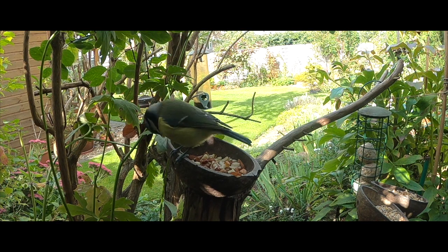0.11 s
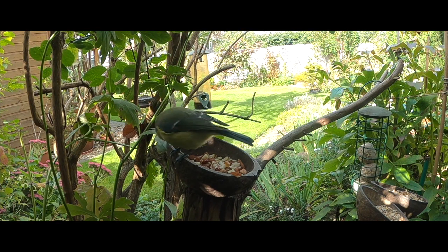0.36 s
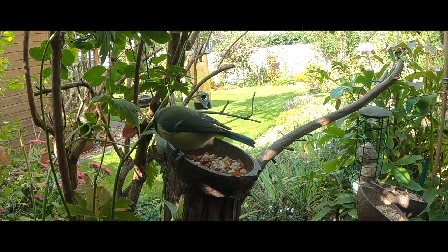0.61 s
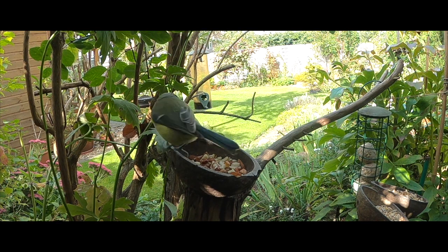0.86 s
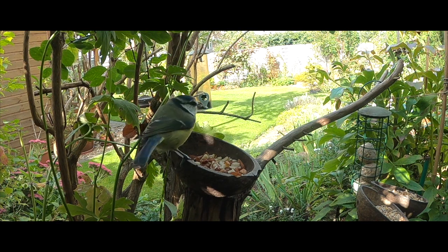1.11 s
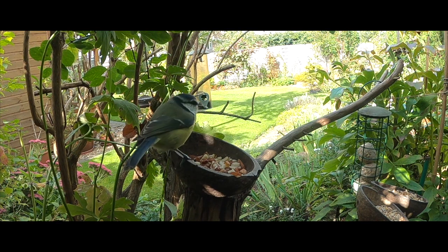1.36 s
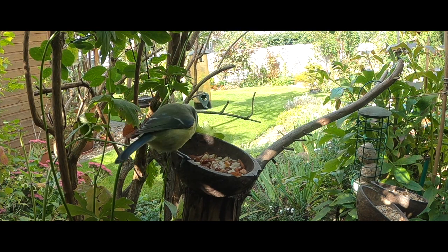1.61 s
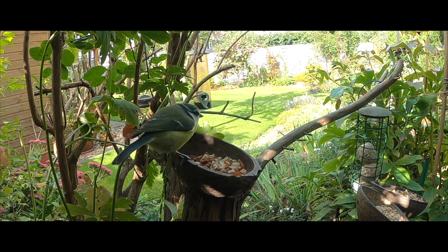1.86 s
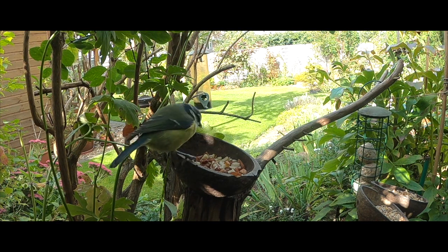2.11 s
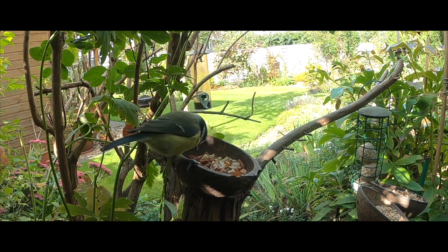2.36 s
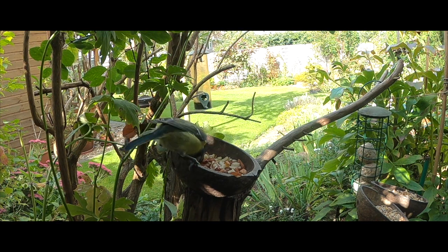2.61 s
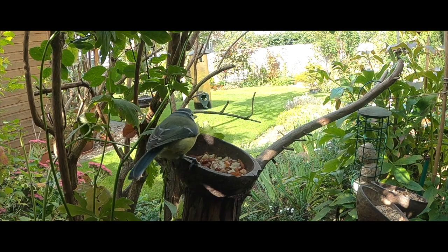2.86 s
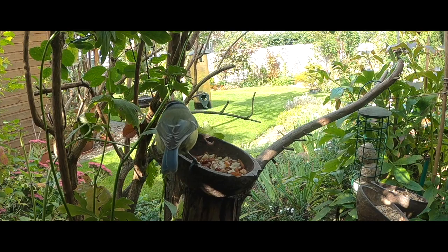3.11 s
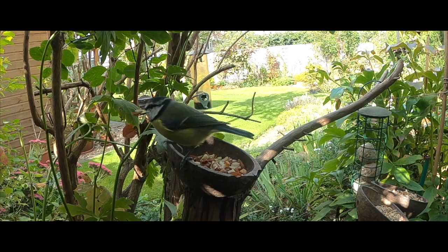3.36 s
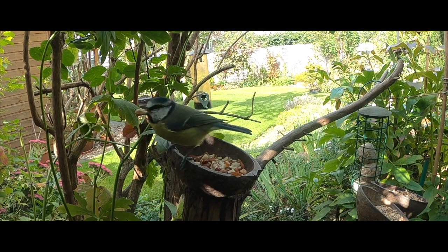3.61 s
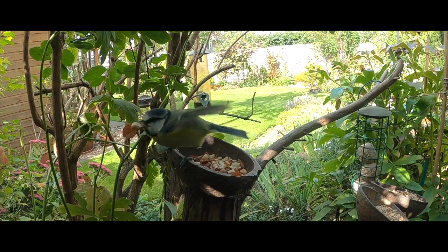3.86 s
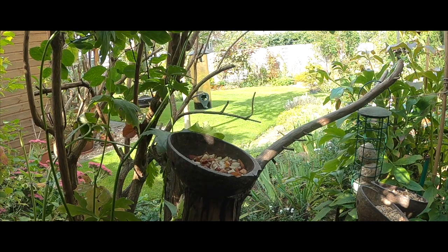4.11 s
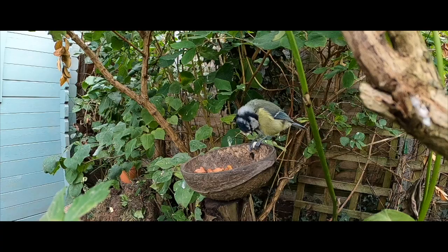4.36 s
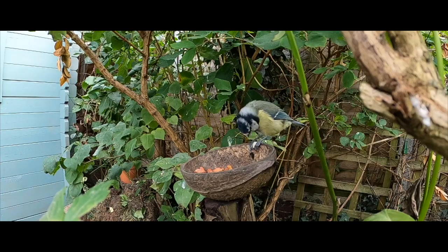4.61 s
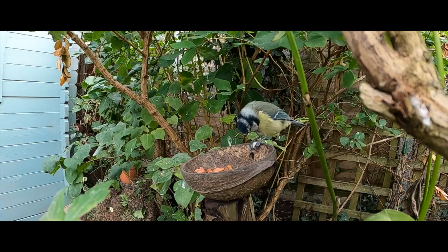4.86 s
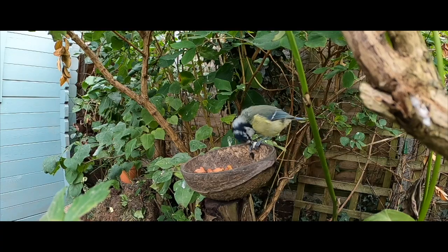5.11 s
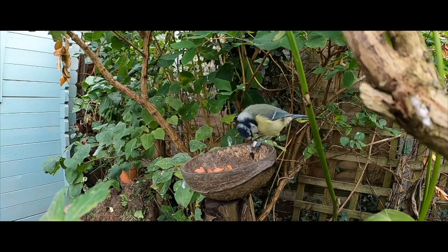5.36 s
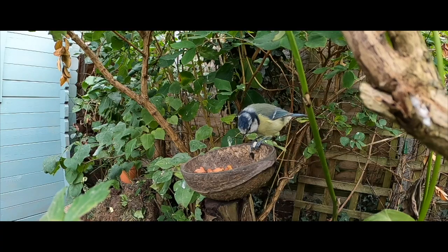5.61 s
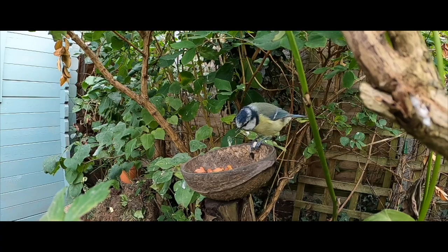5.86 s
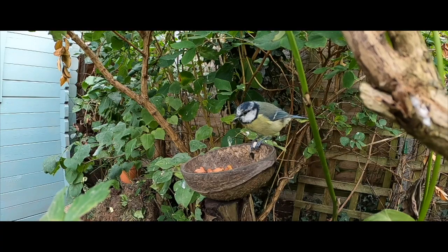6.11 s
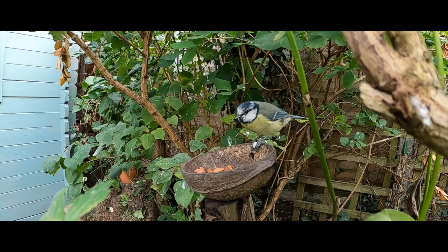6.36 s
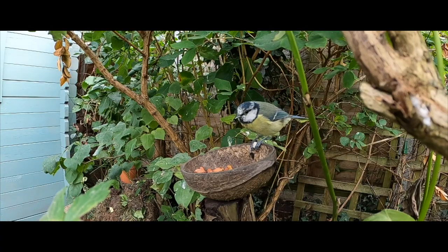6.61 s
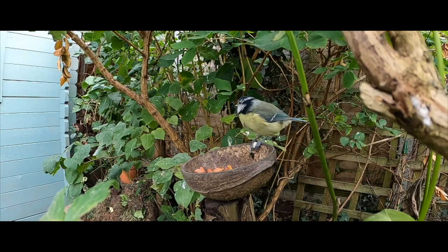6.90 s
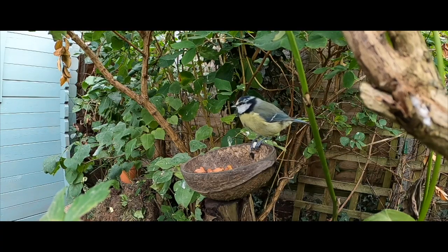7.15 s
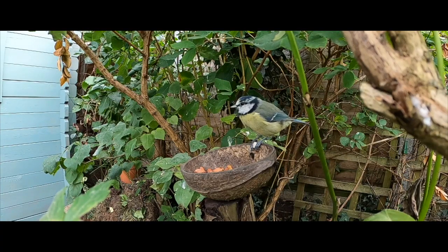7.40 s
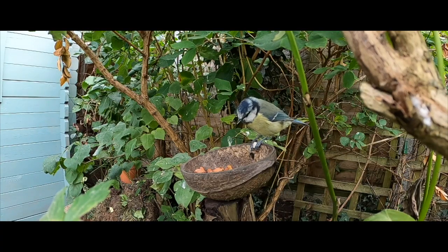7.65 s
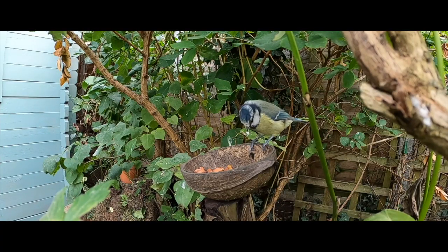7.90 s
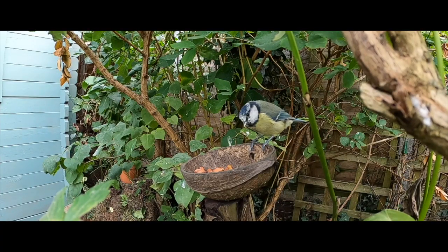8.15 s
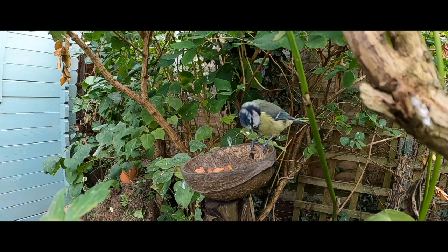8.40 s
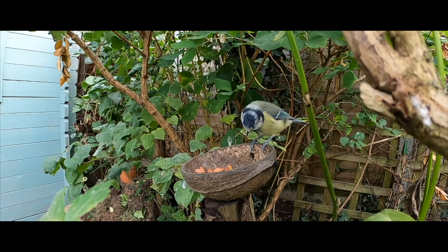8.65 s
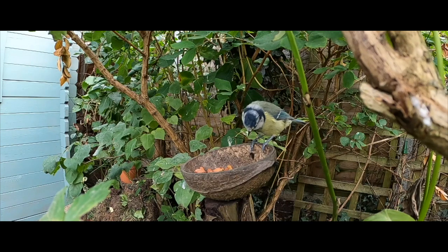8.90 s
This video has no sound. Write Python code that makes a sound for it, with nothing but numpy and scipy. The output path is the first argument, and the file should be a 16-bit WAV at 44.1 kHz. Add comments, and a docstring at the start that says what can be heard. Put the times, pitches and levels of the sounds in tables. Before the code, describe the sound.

Outdoors in a leafy garden, small songbirds chirp, slur and twitter at irregular moments, mostly at middle distance with soft echo. Hoarse far chatter comes in bursts. Tiny dry beak and claw ticks sound close to the stereo microphone, and at four seconds a bird takes off with two soft air thumps. Faint pigeon coos come near the end. A deep engine rumble, mains hum and soft hiss lie underneath throughout.

```python
"""Quiet garden with birds

Songbirds near and far, a close sparrow, falling whistles, high seeps and a faint pigeon, all gliding tones
scattered by hedge and garden; beside the stereo microphones, ticks of filtered noise and the air of a take-off.
Behind them a low bee-like hum, a far engine as a wandering tone in rumble, mains hum as two sines,
and the town, leaves and hiss as shaped noise.
"""
import sys
import numpy as np
from scipy import signal
from scipy.fft import rfft, irfft
from scipy.io import wavfile
from scipy.ndimage import uniform_filter1d

SR = 44100
rng = np.random.default_rng(int(sys.argv[2]) if len(sys.argv) > 2 else 0)


def gain_from_decibels(decibels):
    """Convert decibel values to linear amplitude factors."""
    exponent = np.asarray(decibels, float) / 20
    return 10 ** exponent


def store_pcm(level_fs):
    """Save levels as 16-bit WAV."""
    pcm = np.round(np.clip(level_fs, -1, 1) * 32767).astype(np.int16)
    wavfile.write(sys.argv[1], SR, np.atleast_2d(pcm).T)


N = 397341
TIME = np.arange(N) / SR

# Levels of birds and ticks are those before flutter and placing in the garden.
# songbird notes, straight glides: (start [s], length [s], first pitch [Hz], last pitch [Hz], level [dB])
SONG_NOTES = [(0.0, 0.1, 2590, 2490, -55.5), (.14, .14, 5100, 3900, -61.5), (.3, .06, 3600, 3000, -52),
              (.58, 0.076, 3700, 4500, -62), (.78, 0.098, 4950, 4080, -75), (.98, 0.33, 2110, 2230, -65.5),
              (1.1, .04, 2800, 3740, -54), (1.23, .06, 4000, 4700, -59), (1.32, .025, 3850, 3250, -57),
              (1.36, .037, 4580, 3950, -56), (1.56, 0.1, 4370, 4460, -55), (1.71, .03, 6650, 5450, -63),
              (1.76, .039, 5380, 5340, -58), (1.85, 0.31, 2100, 2150, -66.5),
              (1.87, 0.082, 3450, 3200, -52), (2.0, 0.15, 3480, 2870, -60),
              (2.07, 0.066, 5660, 5490, -53.5), (2.26, .12, 3800, 2900, -65), (2.34, 0.13, 6130, 5800, -59),
              (2.38, 0.15, 4570, 4350, -56), (2.47, 0.032, 3920, 3480, -46),
              (2.51, 0.0293, 4370, 3590, -46), (2.54, 0.027, 2970, 2580, -50),
              (2.55, .056, 3090, 2770, -59), (2.71, 0.0527, 5520, 5250, -49),
              (2.742, 0.066, 5245, 5170, -41), (2.778, .035, 5290, 5560, -46), (2.81, .06, 5480, 5010, -51),
              (3.22, 0.042, 3650, 4200, -55), (3.255, .04, 4200, 4040, -51), (3.28, 0.058, 2790, 2770, -62),
              (3.57, .05, 2900, 3160, -63), (4.12, .046, 3430, 3350, -57), (4.25, .045, 4400, 3700, -49),
              (4.54, 0.065, 3440, 2920, -56), (4.72, 0.042, 4290, 3790, -57.5),
              (4.76, 0.046, 3350, 2800, -59.5), (5.21, .032, 3900, 4850, -49),
              (5.24, 0.051, 4420, 3870, -51), (5.25, 0.033, 3210, 2740, -54),
              (5.55, .088, 4740, 4300, -60.5), (5.93, 0.069, 3320, 3290, -55),
              (6.32, .14, 4330, 4400, -61.5), (6.74, .083, 3470, 2840, -59), (7.22, .12, 4480, 3630, -58.5),
              (7.33, .043, 3300, 2850, -54.5), (7.44, 0.053, 4410, 3750, -55),
              (7.58, .093, 2980, 2610, -46), (7.61, 0.057, 4900, 4500, -56), (7.64, .072, 4540, 4260, -57),
              (8.06, .06, 5480, 5250, -61), (8.1, 0.096, 5170, 4790, -53), (8.28, 0.099, 4990, 4660, -55),
              (8.67, 0.09, 5510, 5390, -55), (8.76, 0.057, 5170, 4430, -60), (8.83, .04, 3760, 3560, -56),
              (8.84, 0.085, 5490, 5230, -62), (8.92, .07, 4720, 4550, -54), (8.94, .032, 3250, 3850, -56)]
# one bird's repeated steep falling slur: (start [s], level [dB])
SLUR_CALLS = [(3.89, -59), (4.35, -46.5), (4.94, -58), (5.16, -52), (5.389, -53.5), (5.871, -51.5),
              (6.085, -52.5), (6.31, -51.5)]
# its shape: (length [s], first pitch [Hz], last pitch [Hz])
SLUR_SHAPE = (.065, 4300, 2400)
# another bird's runs of tiny pips: (start [s], level [dB])
PIP_CALLS = [(3.33, -54.5), (3.41, -56), (3.49, -66), (3.55, -59), (4.44, -54.5), (4.53, -52), (4.61, -53),
             (4.71, -57)]
# their shape: (length [s], first pitch [Hz], last pitch [Hz])
PIP_SHAPE = (.024, 4000, 3450)
# sparrow chirps: (top of the bend [s], fundamental there [Hz], level before partial balance [dB],
# added to all partials but the second [dB], left minus right [dB])
SPARROW_CHIRPS = [(.688, 1820, -49.5, -11, -14.5), (7.612, 1785, -43.5, -15, -5),
                  (8.565, 1840, -48.5, -1, -15.5)]
# balance of the sparrow's partials, fundamental first: (level [dB])
SPARROW_BALANCE_DB = [-7, -2.5, 0.5, -9.5]
# falling whistles: (start [s], loud part [s], trailing part [s], level [dB], change on trailing [dB])
FALLING_WHISTLES = [(4.225, 0.054, .36, -52, -6.5), (6.085, .12, 0.3, -51, -11), (7.75, .26, .33, -52, -10)]
# thin high seeps: (start [s], length [s], first pitch [Hz], last pitch [Hz], level [dB])
SEEP_NOTES = [(.08, 0.07, 8070, 8500, -71), (2.08, 0.15, 7930, 7710, -66), (2.16, 0.22, 7470, 6720, -60),
              (2.27, 0.064, 7820, 7700, -66), (2.91, 0.023, 6320, 6530, -57), (6.34, 0.12, 7900, 7580, -66),
              (6.52, .069, 8140, 7000, -66), (6.6, .028, 7530, 6930, -65), (6.7, .066, 7850, 6870, -65)]
# highest calls, arching up and back: (start [s], top pitch [Hz], level [dB])
ARCH_CALLS = [(6.18, 8200, -70), (6.68, 9150, -71), (6.74, 9060, -70), (6.87, 9200, -72), (6.93, 8960, -69),
              (7.0, 9000, -69), (8.35, 9150, -70), (8.7, 9060, -69), (8.77, 9000, -70)]
# pigeon coos: (start [s], length [s], first pitch [Hz], level [dB])
PIGEON_COOS = [(6.67, 0.39, 568, -56), (7.42, 0.1, 562, -58.5), (8.0, 0.079, 564, -60),
               (8.28, 0.093, 544, -58)]
# hoarse bursts of far chatter, the highest few perhaps rustling feathers:
# (start [s], length [s], lowest pitch [Hz], level [dB])
CHATTER_BURSTS = [(0.166, .13, 3600, -67), (.25, .18, 4400, -68.5), (0.269, 0.23, 2850, -62),
                  (0.519, .22, 4040, -65.5), (0.633, 0.11, 2700, -58.5), (0.919, 0.26, 4180, -66.5),
                  (1.103, 0.13, 2970, -60.5), (1.3, .18, 4130, -61), (1.398, 0.34, 3034, -63.5),
                  (1.72, .12, 4460, -65), (1.832, 0.34, 4380, -63), (1.84, 0.2, 2815, -59),
                  (2.236, 0.15, 2900, -62.5), (2.428, 0.23, 2820, -64), (2.43, 0.23, 4100, -60.5),
                  (2.574, 0.046, 6580, -67), (2.725, .18, 2800, -63), (2.724, 0.2, 3710, -61.5),
                  (2.916, .06, 5800, -67), (3.003, 0.13, 2830, -61), (3.004, 0.14, 4180, -62),
                  (3.27, .045, 6200, -70), (3.466, 0.24, 4250, -68), (3.571, .067, 2740, -62),
                  (3.695, .17, 2904, -57), (3.743, 0.084, 4070, -66), (3.94, 0.15, 6440, -73),
                  (3.978, 0.11, 4090, -64), (3.981, 0.2, 2880, -58), (4.177, 0.23, 3020, -58),
                  (4.178, 0.2, 4160, -64.5), (4.626, .21, 4300, -65), (5.101, .26, 2710, -63.5),
                  (5.103, .26, 3650, -61), (5.35, .13, 3530, -65), (5.599, 0.14, 2996, -59.5),
                  (5.616, .32, 4210, -69.5), (5.898, 0.32, 2800, -63), (6.27, .19, 2850, -65),
                  (6.273, .19, 4250, -67), (6.482, 0.066, 4490, -61.5), (6.491, .14, 3050, -58.5),
                  (6.669, 0.1, 4120, -64), (6.724, 0.12, 2670, -58.5), (6.86, 0.073, 4400, -62.5),
                  (6.882, .116, 2850, -59.5), (7.177, 0.11, 3950, -65), (7.36, 0.14, 3310, -57.5),
                  (7.568, 0.087, 2750, -56), (7.569, 0.06, 3960, -56), (7.699, .2, 4377, -63.5),
                  (7.859, 0.068, 3010, -56.5), (8.185, .13, 4420, -61), (8.28, 0.22, 2970, -57.5),
                  (8.297, 0.22, 4400, -64.5), (8.524, 0.12, 2695, -55), (8.518, .11, 3880, -56),
                  (8.701, 0.28, 2790, -68), (8.702, 0.38, 4040, -65)]
# beak and claw ticks, feather snaps: (time [s], peak level [dB], centre [Hz])
CLOSE_TICKS = [(0.2886, -42, 6750), (0.3054, -45, 6500), (0.344, -52, 7960), (0.3564, -56, 7850),
               (0.4164, -56, 6500), (0.4264, -42, 7400), (0.4334, -43.5, 7440), (0.4394, -56, 7590),
               (3.2818, -50, 7480), (3.9519, -48, 7300), (3.9644, -45, 7680), (4.004, -49, 8230),
               (4.0382, -46, 7570), (4.0697, -51, 6570), (4.0941, -57, 7880), (4.7207, -52, 6620),
               (5.3457, -51, 6960), (5.5009, -42.5, 7140), (7.9238, -50, 8600), (7.9875, -48, 8810)]
# air pushed over the microphones at take-off: (time [s], gain [dB])
WING_STROKES = [(3.985, -26.5), (4.044, -19.5)]
# a low hum, perhaps a bee: (time [s], pitch [Hz], level before flutter [dB])
BEE_PATH = [(0.4, 251.7, -63.5), (0.6, 254.9, -55.5), (0.93, 255, -56.5)]
# far engine, before pitch and level wander: (time [s], pitch [Hz], level [dB])
ENGINE_PATH = [(0.0, 30.1, -30.5), (0.15, 27.64, -34), (1.55, 27.78, -35), (2.16, 27.97, -31.5),
               (2.36, 25.25, -37), (2.58, 21.75, -32), (2.86, 22.02, -34), (3.19, 30.1, -30.5),
               (3.29, 31.47, -30), (5.69, 31.48, -35.5), (5.82, 28.24, -36.5), (7.9, 28.79, -32.5),
               (8.5, 28.97, -38.5), (8.66, 26.1, -37.5), (9.01, 27.2, -34)]
# mains hum partials: (pitch [Hz], centre level above the swell [dB], left-against-right level [dB])
HUM_PARTIALS = [(100.9, 6, -43), (201, -3, -94)]
# coming and going of the hum in the centre: (time [s], level [dB])
HUM_CENTRE_SWELL = [(0.0, -57), (0.15, -55.5), (1.76, -60), (1.96, -77), (2.23, -60.5), (4.14, -57),
                    (4.54, -65.5), (7.83, -56.5), (8.03, -67), (8.38, -55), (9.01, -68)]
# colour of the background noise: (frequency [Hz], relative density [dB])
TOWN_COLOUR = [(12, -3.5), (30, -19), (45, -11.5), (62, -7.5), (82, -21), (150, -24), (350, -27.5),
               (700, -28.5), (1100, -33), (2200, -42), (3800, -40.5), (5200, -45), (6300, -51.5),
               (9500, -55.5), (15600, -58)]
# likeness of left and right in that noise: (frequency [Hz], correlation [0-1])
TOWN_LIKENESS = [(30, 1), (60, 1), (130, 0), (290, 0.11), (640, 0.29), (1400, 0.6), (3100, 0.36),
                 (6800, 0.23), (15000, 0)]


def level(x, db):
    """Scale to an rms level."""
    return x * gain_from_decibels(db) / np.sqrt(np.mean(x ** 2))


def walk(rate):
    """Slow chance of rms 1: random steps at about `rate` per second, smoothed twice."""
    k = max(int(SR / rate), 2)
    steps = np.repeat(rng.standard_normal(N // k + 1), k)
    return level(uniform_filter1d(uniform_filter1d(steps, k), k)[:N], 0)


def band(x, lo_hz, hi_hz):
    """Band-pass."""
    return signal.sosfilt(signal.butter(2, [lo_hz, hi_hz], "band", fs=SR, output="sos"), x)


def add(out, s, sound):
    """Mix a short sound in at a time."""
    i = max(int(s * SR), 0)
    out[i:i + len(sound)] += sound[:max(N - i, 0)]


def echoes(x, t60_s, gap_s):
    """Scattered returns from fences, walls and leaves: decaying noise of energy 1, unrelated left and right."""
    t = np.arange(int(t60_s * SR)) / SR
    build_up = 1 - np.exp(-t / gap_s)
    tail = rng.standard_normal((2, len(t))) * gain_from_decibels(-60 * t / t60_s) * build_up
    tail = tail / np.sqrt(np.sum(tail ** 2, axis=1, keepdims=True))
    return signal.fftconvolve(np.atleast_2d(x), tail, axes=1)[:, :N]


def placed(x, pan_db, hedge_db, wet_db):
    """Direct sound and quick hedge scatter from one side, plus a long garden echo blurred by moving leaves."""
    side = gain_from_decibels(np.array([pan_db, -pan_db]).reshape(2, -1) / 2)  # pan_db is left minus right
    near = side * (x + gain_from_decibels(hedge_db) * echoes(x, t60_s=0.098, gap_s=.003))
    blurred = x * (.4 + .9 * walk(260))
    return near + gain_from_decibels(wet_db) * echoes(blurred, t60_s=1.1, gap_s=.02)


def notes(table, flutter_db, rasp, rasp_hz, swell, arch=0.):
    """Gliding notes swell and fade; level flutters, and a random rasp spreads each around its pitch."""
    out = np.zeros(N)
    for s, length, first, last, db in table:
        u = np.linspace(0, 1, int(length * SR) + 2)
        hz = (first + (last - first) * u) * (1 - arch * (2 * u - 1) ** 2)  # an arch lowers both ends
        tone = np.sin(np.cumsum(2 * np.pi * hz / SR))
        add(out, s, gain_from_decibels(db) * np.sin(np.pi * u) ** swell * tone)
    return out * gain_from_decibels(flutter_db * walk(70)) * (1 + rasp * walk(rasp_hz))


def held(curves, flutter_db, edge_s):
    """Near-pure tones follow their pitch and rms level, with soft edges and a fluttering level."""
    out = np.zeros(N)
    for s, hz, db in map(np.transpose, curves):
        t = np.arange(s[0], s[-1], 1 / SR)
        fade = np.clip(np.minimum(t - s[0], s[-1] - t) / edge_s, 0, 1)
        tone = np.sin(np.cumsum(2 * np.pi * np.interp(t, s, hz) / SR))
        add(out, s[0], np.sqrt(2) * fade * gain_from_decibels(np.interp(t, s, db)) * tone)
    return out * gain_from_decibels(flutter_db * walk(30))


def songbirds(count=60):
    """Single notes, slurs, pips and faint twitter at random moments share one kind of gliding voice."""
    when, long, pitch, fall, size = rng.random((count, 5)).T
    low_hz, high_hz, largest_fall, loudest_db = 3200, 5230, 0.21, -61
    hz = low_hz + (high_hz - low_hz) * pitch
    last_hz = hz * (1 - largest_fall * fall)
    twitter = zip(when * N / SR, .03 + 0.0503 * long, hz, last_hz, loudest_db - 6 * size)
    slurs = [(s, *SLUR_SHAPE, db) for s, db in SLUR_CALLS]
    pips = [(s, *PIP_SHAPE, db) for s, db in PIP_CALLS]
    table = list(SONG_NOTES) + slurs + pips + list(twitter)
    voice = notes(table, flutter_db=1.6, rasp=.45, rasp_hz=350, swell=.6)
    return placed(voice, -3., hedge_db=-7, wet_db=-8)


def sparrow():
    """A harsh stack of partials bends quickly up, then down, and loses its treble as it falls."""
    rise_s, fall_s = .035, .062
    start, end = .78, .67  # pitch at either end as a share of the top
    darken_db = -12  # change on the way down, times the partial's steps above the second
    out, t = np.zeros(N), np.arange(-rise_s, fall_s, 1 / SR)
    rising_bend = 1 - (1 - start) * np.abs(t / rise_s) ** 1.3
    falling_bend = 1 - (1 - end) * np.abs(t / fall_s) ** 1.1
    bend = np.where(t < 0, rising_bend, falling_bend)
    shape = np.sin(np.pi * np.linspace(0, 1, len(t))) ** 0.48
    falling = np.clip(t / 0.0051, 0, 1)
    for s, hz, db, others_db, _ in SPARROW_CHIRPS:
        phase = np.cumsum(2 * np.pi * hz * bend / SR)
        stack = 0
        for k, part_db in enumerate(SPARROW_BALANCE_DB):
            partial_db = part_db + others_db * (k != 1) + darken_db * max(k - 1, 0) * falling
            stack = stack + gain_from_decibels(partial_db) * np.sin((k + 1) * phase)
        add(out, s - rise_s, gain_from_decibels(db) * shape * stack)
    out = out * gain_from_decibels(1.8 * walk(70)) * (1 + .3 * walk(900))  # flutter and rasp
    chirps = np.array(SPARROW_CHIRPS)
    pan_db = np.interp(TIME, chirps[:, 0], chirps[:, -1])
    return placed(out, pan_db, hedge_db=-3, wet_db=-6)


def whistles():
    """Pitch settles from a high start; the tone trails on quietly, and long ones sag at the end."""
    top_hz, rest_hz, settle_s = 2724, 2247, .055
    sag_hz_per_s, sag_after_s = 1100, .23
    rise_db, fade_db = -8, -4  # level at the onset, and further change along the trail
    curves = []
    for s, loud, trail, db, trail_db in FALLING_WHISTLES:
        t = np.arange(0, loud + trail, .002)
        settling = rest_hz + (top_hz - rest_hz) * np.exp(-t / settle_s)
        hz = settling - sag_hz_per_s * np.maximum(t - sag_after_s, 0)
        points_s = [0, .045, loud, loud + 0.021, loud + trail]
        shape_db = np.interp(t, points_s, [rise_db, 0, 0, trail_db, trail_db + fade_db])
        curves.append(np.transpose([s + t, hz, db + shape_db]))
    return placed(held(curves, flutter_db=1.5, edge_s=.015), -3., hedge_db=-5, wet_db=.8)


def seeps():
    """Thin glides and small pitch arches at the top of the range."""
    voice = dict(flutter_db=1.8, rasp=.35, rasp_hz=400, swell=.6)
    arch_s = 0.063
    arch_table = [(s, arch_s, hz, hz, db) for s, hz, db in ARCH_CALLS]
    arches = notes(arch_table, arch=0.044, **voice)  # depth as a share of the top pitch
    return placed(notes(SEEP_NOTES, **voice) + arches, 1.5, hedge_db=-5, wet_db=-9)


def pigeon():
    """Soft level notes whose pitch sags a little."""
    sag_hz = 4
    curves = [[(s, hz, db), (s + length, hz - sag_hz, db)] for s, length, hz, db in PIGEON_COOS]
    return placed(held(curves, flutter_db=1.6, edge_s=.02), 0., hedge_db=-12, wet_db=-10)


def flock(count=3):
    """In each burst a few birds trill falling chirps across the band, hoarse and out of step."""
    span = 1.42  # highest over lowest pitch
    out, rasp, drift = np.zeros(N), walk(900), walk(25)
    chances = rng.random((len(CHATTER_BURSTS), count, 2))
    for (s, length, low, db), chance in zip(CHATTER_BURSTS, chances):
        t = np.arange(int(length * SR)) / SR
        here = np.minimum(int(s * SR) + np.arange(len(t)), N - 1)
        chirps_per_s = 18 + 30 * chance[:, 1:]
        turn = (chance[:, :1] + t * chirps_per_s + .15 * drift[here]) % 1  # place within a chirp
        hz = low * (span - (span - 1) * turn)
        chirps = np.sin(np.pi * turn) ** 0.3 * np.sin(np.cumsum(2 * np.pi * hz / SR, axis=1))
        hoarse = chirps.sum(axis=0) * (1 + .9 * rasp[here])
        fade = np.clip(np.minimum(t / 0.0096, (length - t) / 0.022), 0, 1)
        add(out, s, fade * level(hoarse, db))
    return out


def chorus():
    """Far off, the chatter arrives mostly scattered."""
    return placed(flock(), -2.3, hedge_db=5.5, wet_db=-1) * gain_from_decibels(-1.5)


def ticks():
    """A few milliseconds of bright crackle: decaying noise filtered twice around a centre pitch."""
    out, t = np.zeros(N), np.arange(600) / SR
    noises = rng.standard_normal((len(CLOSE_TICKS), len(t)))
    for (s, db, hz), noise in zip(CLOSE_TICKS, noises):
        lo_hz, hi_hz = hz * 0.73, hz * 1.19
        tick = band(band(noise * np.exp(-t / 0.0024), lo_hz, hi_hz), lo_hz, hi_hz)
        add(out, s, gain_from_decibels(db) * tick / np.abs(tick).max())
    return out


def wings():
    """Each downstroke is one slow push and pull of air."""
    lead_s = .04
    out, t = np.zeros(N), np.arange(-lead_s, .06, 1 / SR)
    for s, db in WING_STROKES:
        add(out, s - lead_s, -gain_from_decibels(db) * np.tanh(t / 0.0022) * np.exp(-(t / 0.01) ** 2))
    return out


def bee():
    """A low near-pure hum with a fluttering level, equal on both sides."""
    return held([BEE_PATH], flutter_db=4.0, edge_s=0.047)


def drone():
    """A very low engine tone wanders and throbs inside its own rumble, nearly the same on both sides."""
    s, hz, db = np.transpose(ENGINE_PATH)
    wandering_hz = np.interp(TIME, s, hz) * (1 + 0.037 * walk(21))
    phase = np.cumsum(2 * np.pi * wandering_hz / SR)
    rumble = level(band(rng.standard_normal(N), 11.5, 38.0), -7.0)
    tone = level(np.sin(phase) * gain_from_decibels(0.48 * walk(27)), -2.35)
    sway_db = 0.37 * walk(2.6) * np.array([[1], [-1]])  # opposite left and right
    return (tone + rumble) * gain_from_decibels(np.interp(TIME, s, db) + sway_db)


def hum():
    """Mains buzz: steady where left opposes right, coming and going in the centre."""
    out, swell_db = 0, np.interp(TIME, *np.transpose(HUM_CENTRE_SWELL))
    for hz, mid_db, side_db in HUM_PARTIALS:
        turn = 2 * np.pi * hz * TIME
        centre = np.sin(turn + 1.93 + 0.72 * walk(2.8)) * gain_from_decibels(mid_db + swell_db)
        opposed = np.sin(turn) * gain_from_decibels(side_db) * np.array([[1], [-1]])
        out = out + centre + opposed
    return out


def town():
    """Far traffic, leaves and microphone hiss: shaped noise whose left-right likeness varies with pitch."""
    log_hz = np.log(np.maximum(np.fft.rfftfreq(N, 1 / SR), 1))
    colour_hz, colour_db = np.transpose(TOWN_COLOUR)
    like_hz, likeness = np.transpose(TOWN_LIKENESS)
    colour = gain_from_decibels(np.interp(log_hz, np.log(colour_hz), colour_db))
    like = np.clip(np.interp(log_hz, np.log(like_hz), likeness), -1, 1)
    spectra = rfft(rng.standard_normal((2, N))) * colour
    mid, side = irfft(spectra * np.sqrt([1 + like, 1 - like]), N)
    return level(np.array([mid + side, mid - side]), -41) * gain_from_decibels(.5 * walk(0.66))  # slow level drift


def scene():
    """All voices in their places, near and far."""
    birds = songbirds() + sparrow() + whistles() + seeps() + pigeon() + chorus()
    near = placed(ticks(), 0., hedge_db=-8, wet_db=-28) + wings()
    return birds + near + bee() + drone() + hum() + town()


def low_pass(x):
    """Removes everything above the highest recorded frequency."""
    return signal.sosfilt(signal.butter(12, 15770, fs=SR, output="sos"), x)


def record(dry):
    """The converter behind the microphones adds a slight constant offset."""
    mix = dry - .0012
    return low_pass(mix)


dry = scene()
out = record(dry)
store_pcm(out)
```